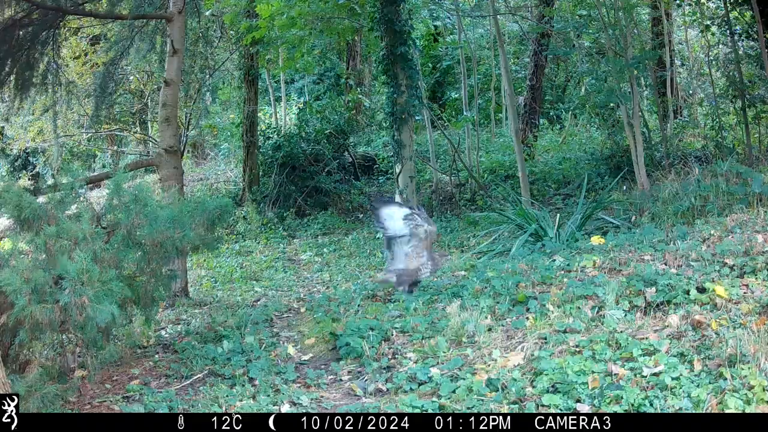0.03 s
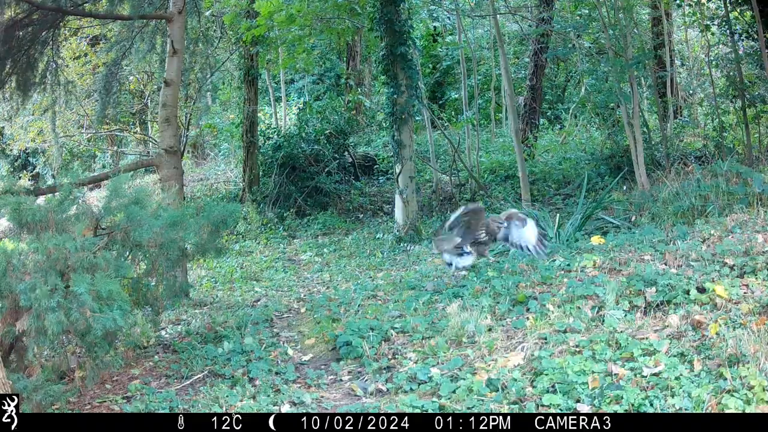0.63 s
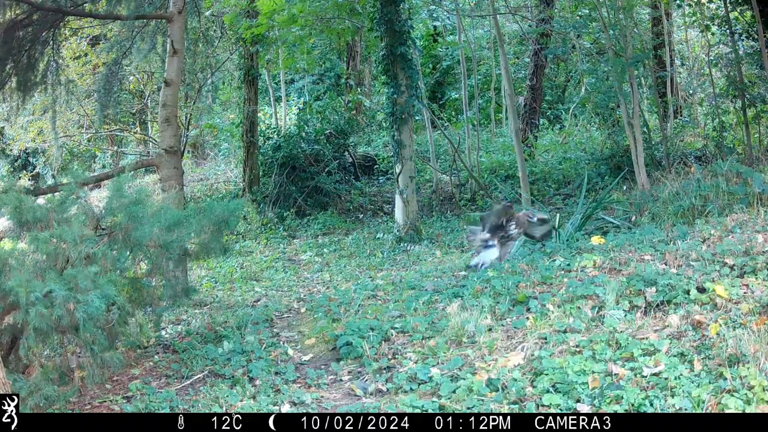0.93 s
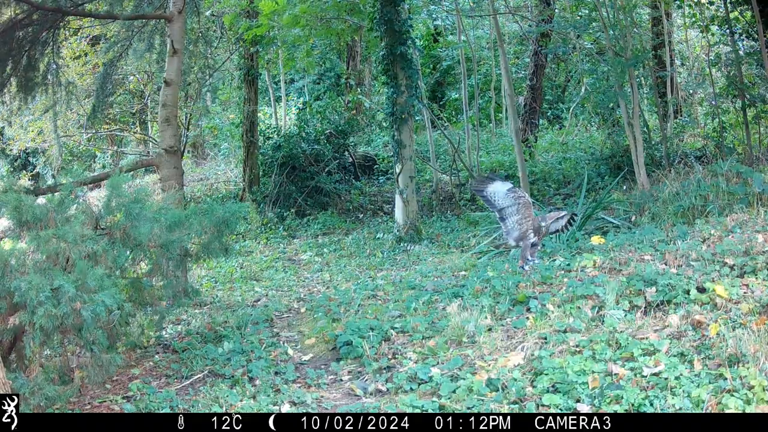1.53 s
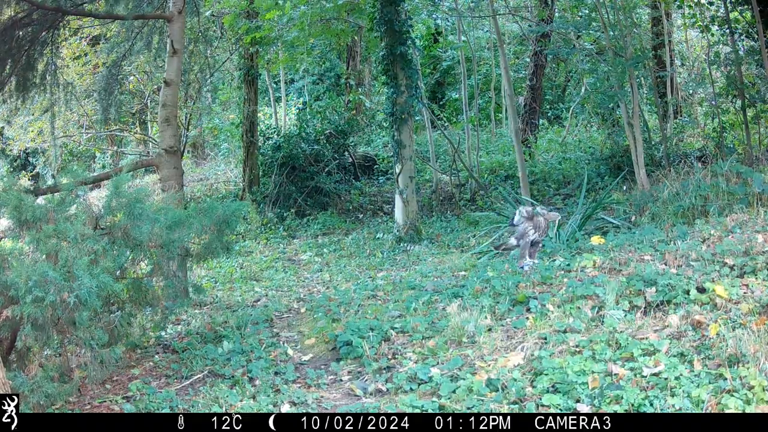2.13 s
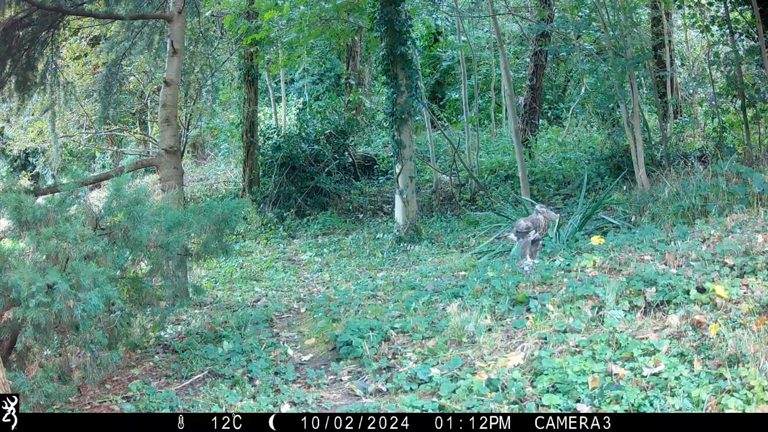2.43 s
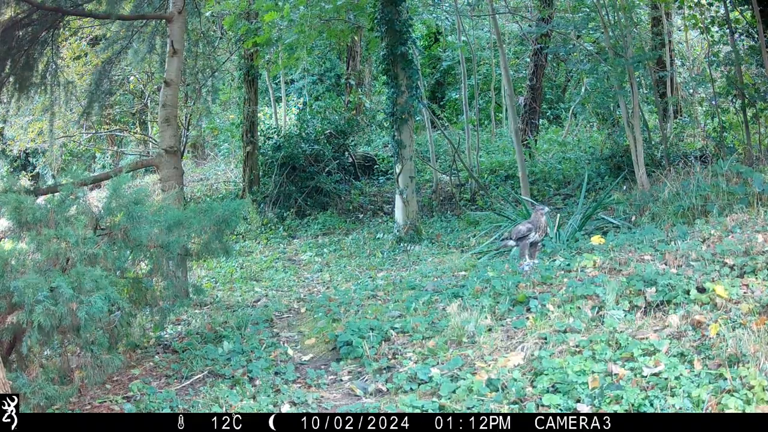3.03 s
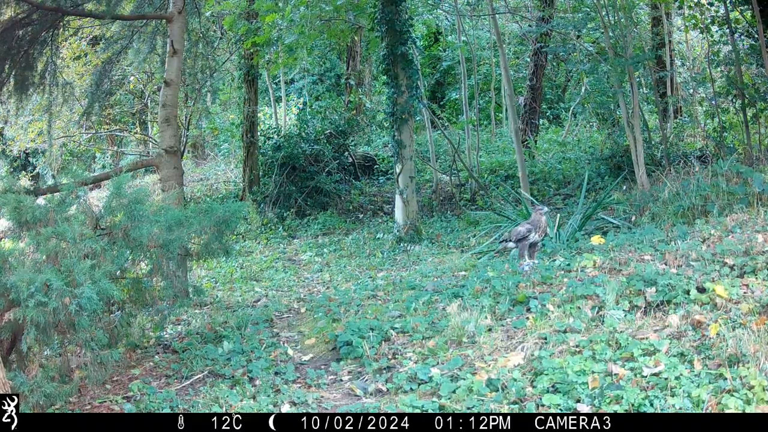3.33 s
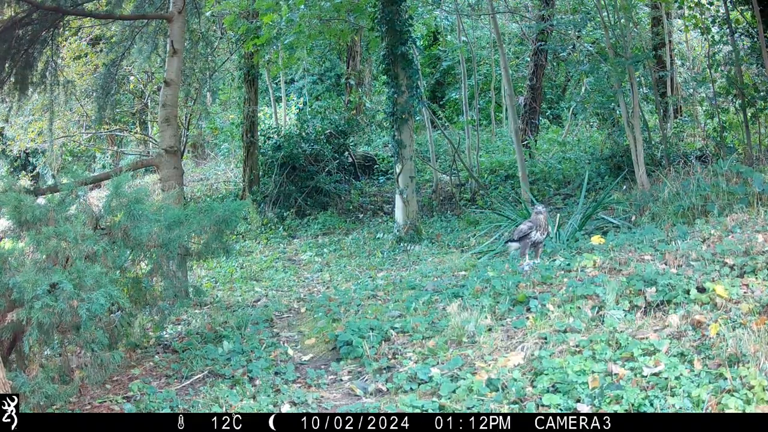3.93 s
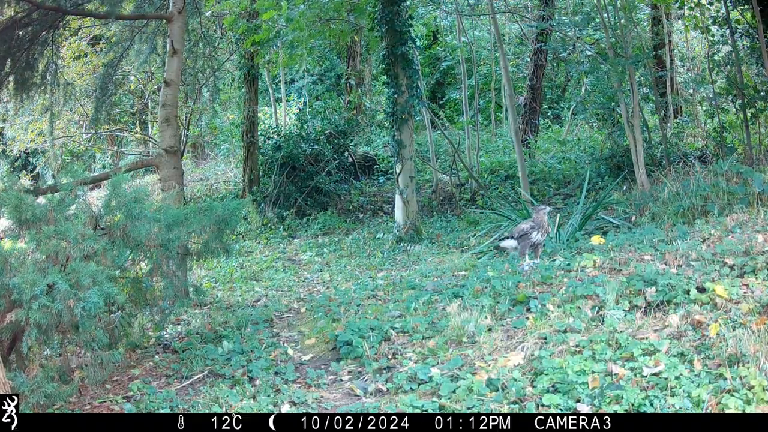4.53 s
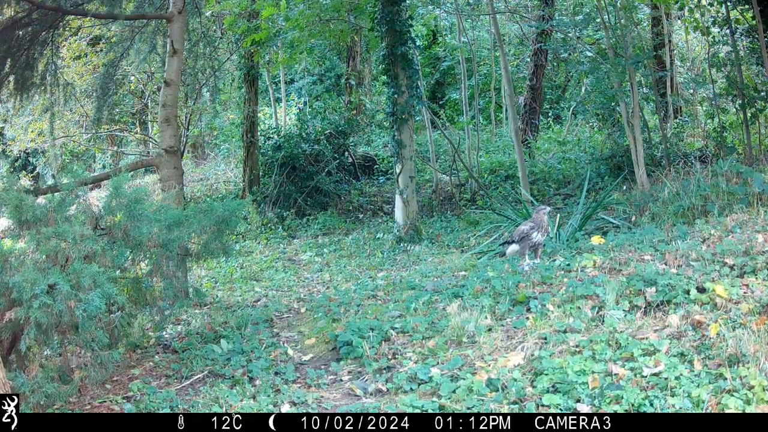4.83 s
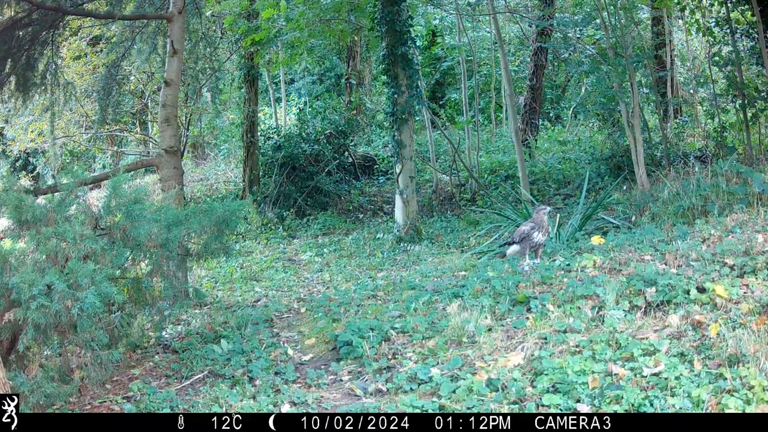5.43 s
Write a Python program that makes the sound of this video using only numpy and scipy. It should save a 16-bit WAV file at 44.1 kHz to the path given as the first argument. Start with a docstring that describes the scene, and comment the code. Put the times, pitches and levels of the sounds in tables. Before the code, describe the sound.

Irregular puffs of air hit a small outdoor microphone, making short low rumbles and clusters of muffled thumps, like buffeting wind or flapping wings. After several stronger ones, they ease into occasional soft bumps. Behind them, quiet woodland carries on throughout: an even hiss of breeze in the leaves, a faint faraway traffic rush with a low drone growing slightly late on, and a few barely audible ticks of dry leaves.

```python
"""A wooded garden where a bird of prey flaps about and settles, heard from a small outdoor camera.
The bed is a steady hiss of leaves in the breeze over a far rush, probably traffic, with a few dry
leaf ticks. Up front, puffs of moving air buffet the microphone port: a lumpy rumble whose
strongest eddies land as clusters of dull pops."""
import sys
import numpy as np
from scipy import signal
from scipy.fft import rfft, irfft, next_fast_len
from scipy.io import wavfile
from scipy.ndimage import uniform_filter1d

SR = 44100
rng = np.random.default_rng(int(sys.argv[2]) if len(sys.argv) > 2 else 0)


def inscribe(sig):
    """Save sig as 16-bit PCM at rate SR to the path in sys.argv[1].

    A 1-D sig is mono; a 2-D sig holds one channel per row.
    Samples are clipped to [-1, 1] before scaling.
    """
    pcm = np.round(np.clip(np.atleast_2d(sig).T, -1, 1) * 32767)
    wavfile.write(sys.argv[1], SR, pcm.astype(np.int16))


N = 246078
T = np.arange(N) / SR

# swells of the far traffic: time_s, rush_db, rush_pitch_hz, drone_db
TRAFFIC_SWELLS = [(0.21, -61.5, 900, -79), (0.8, -61, 880, -73), (1.2, -50, 974, -70),
                  (1.55, -51, 980, -65), (1.85, -55, 946.5, -73), (2.3, -54, 960.3, -76),
                  (2.95, -53, 988, -66), (3.25, -55, 920, -65.5), (3.8, -75, 907, -62.5),
                  (4.4, -57.5, 963, -63.5), (4.9, -61, 908.7, -59.5), (5.58, -67, 896, -63)]
# resonances that colour the low drone: centre_hz, width_hz, gain_db
DRONE_RESONANCES = [(180, 22, 4), (445, 63, -7), (583, 183, 8.5), (644, 46, -1.5)]
# breeze in the trees: time_s, hiss_db, sizzle_db
BREEZE_LEVELS = [(0.21, -51, -73), (0.5, -51.5, -75.5), (1.0, -51, -77), (1.7, -51.5, -79.5),
                 (2.5, -51, -80.5), (3.5, -51.6, -79.5), (4.4, -51, -80), (5.58, -50.5, -80.5)]
# tone of the leaf hiss: frequency_hz, gain_db
HISS_SPECTRUM = [(25, -14), (90, -14), (200, -15.5), (330, -6), (550, -4.5), (850, 0), (1200, 0),
                 (1600, 0.5), (2100, -4), (3000, -10.5), (4500, -22.5), (7000, -43.5), (10000, -54.5)]
# tone of the fine sizzle on top: frequency_hz, gain_db
SIZZLE_SPECTRUM = [(2000, -2), (5000, 9), (7500, -1.5), (9500, -1.5), (11000, -6), (13000, -13.5),
                   (16000, -19)]
# dry leaves shifting: time_s, level_db
LEAF_TICKS = [(0.612, -75), (1.06, -74), (1.315, -71), (2.905, -74), (4.065, -69.5)]
# puffs of air reaching the port: peak_s, strength_db, swell_s
AIR_PUFFS = [(0.299, -42, 0.039), (0.36, -44, 0.024), (0.445, -57, 0.022), (0.903, -53.5, 0.027),
             (1.079, -50, 0.033), (1.16, -44.5, 0.057), (1.24, -50, 0.055), (1.378, -44.5, .022),
             (1.455, -40, 0.027), (1.7, -61, 0.1), (1.984, -33.5, 0.025), (2.055, -43.5, .014),
             (2.18, -54, 0.072), (2.258, -42, 0.019), (2.4, -48, 0.017), (2.506, -57, 0.016),
             (3.075, -53.5, .012), (3.134, -50.5, 0.023), (3.21, -55.5, 0.016), (3.32, -50.5, 0.038),
             (3.5, -58, .12), (3.96, -59.5, 0.044), (4.089, -50.5, 0.015), (4.179, -54, 0.054),
             (4.67, -62.5, 0.043), (5.26, -59, .025), (5.43, -52, 0.025), (5.512, -50.5, .024)]
# rumble bands, one per size of swirl: centre_hz, relative_db, flow_exponent, edge_steepness
SWIRL_BANDS = [(65, -13.5, 0.56, 2.04), (174.6, 0, 1.07, 2.47), (315, 1.5, 2.07, 2.04)]
# strongest eddies, each a single pop: time_s, relative_db, nominal_pitch_hz
STRONG_EDDIES = [(0.2729, -33, 240), (0.28, -21.5, 275), (0.2875, -30, 450), (0.303, -25, 780),
                 (0.3062, -19, 560), (0.31, -19.5, 450), (0.3175, -9.5, 670), (0.3225, -25, 440),
                 (1.1222, -25, 300), (1.13, -18.5, 439.7), (1.166, -30, 380), (1.3605, -31, 280),
                 (1.3928, -25.5, 320), (1.442, -16.5, 447), (1.4515, -29, 380), (1.464, -21, 383),
                 (1.9727, -16, 430), (1.9818, -21, 300), (1.9914, -20.5, 425), (2.0259, -21, 260),
                 (2.0297, -21, 462), (2.2517, -24.5, 340), (2.257, -23.5, 250), (2.297, -30, 220),
                 (3.306, -32.5, 236)]
# moments when the treble dips: centre_s, half_span_s
DULL_MOMENTS = [(0.591, 0.0069), (0.742, 0.009), (0.975, 0.0061), (1.22, .031), (1.528, .018),
                (1.85, 0.015), (3.449, 0.0076), (3.537, 0.0058), (3.618, 0.007), (3.685, .008),
                (3.748, 0.0066), (3.856, 0.01), (4.006, .01)]

CEILING_DB = -43.5   # puff strength at which the flow starts to level off


def from_db(db):
    """Decibels to gain."""
    return 10 ** (np.asarray(db) / 20)


def unit_rms(x):
    """Scale to an rms of 1."""
    return x / np.sqrt(np.mean(x ** 2) + 1e-20)


def automation(rows):
    """Rows of (time_s, values...) become one curve per value, at every sample."""
    times_s, *columns = np.transpose(rows)
    return [np.interp(T, times_s, column) for column in columns]


def shaped_noise(gain_at):
    """Noise of rms 1, shaped by a gain that depends on frequency."""
    size = next_fast_len(N)
    hz = np.maximum(np.arange(size // 2 + 1) * SR / size, 1)
    white = rfft(rng.standard_normal(size))
    return unit_rms(irfft(white * gain_at(hz), size)[:N])


def coloured_noise(spectrum):
    """Noise with an EQ curve drawn through (frequency_hz, gain_db) points."""
    points_hz, db = np.transpose(spectrum)
    return shaped_noise(lambda hz: from_db(np.interp(np.log(hz), np.log(points_hz), db)))


def drift(rate_hz):
    """A smooth random wobble of rms 1, mostly slower than rate_hz."""
    return shaped_noise(lambda hz: 1 / (1 + (hz / rate_hz) ** 2))


def traffic(rush_spread_hz):
    """Far tyres give one broad, gliding band of noise; a lower drone swells later."""
    rush_db, rush_hz, drone_db = automation(TRAFFIC_SWELLS)
    phase = 2 * np.pi * np.cumsum(rush_hz) / SR
    rush = drift(rush_spread_hz) * np.cos(phase) + drift(rush_spread_hz) * np.sin(phase)
    drone = shaped_noise(lambda hz: sum(from_db(db) / (1 + (2 * (hz - centre_hz) / width_hz) ** 2)
                                        for centre_hz, width_hz, db in DRONE_RESONANCES))
    return from_db(rush_db) * rush + from_db(drone_db) * drone


def leaves(flutter_db, flutter_hz):
    """Countless far leaves merge into a smooth hiss; three trees each stir on their own."""
    hiss_db, sizzle_db = automation(BREEZE_LEVELS)
    trees = sum(coloured_noise(HISS_SPECTRUM) * from_db(flutter_db * drift(flutter_hz))
                for _ in range(3))
    return from_db(hiss_db) * unit_rms(trees) + from_db(sizzle_db) * coloured_noise(SIZZLE_SPECTRUM)


def leaf_ticks(centre_hz, half_width_s):
    """A dry leaf shifts with a short, crisp crackle."""
    crackle = shaped_noise(lambda hz: 1 / (1 + (3 * np.log(hz / centre_hz)) ** 4))
    bursts = sum(from_db(db) * np.exp(-((T - time_s) / half_width_s) ** 2) for time_s, db in LEAF_TICKS)
    return bursts * crackle / np.abs(crackle).max()


def airflow(calm_db, fall_stretch, stir_db, stir_decay_s):
    """Flow over the port, 0-1: each puff swells, falls and leaves a tail of stirred air."""
    power = from_db(calm_db) ** 2
    for peak_s, db, swell_s in AIR_PUFFS:
        before, after = np.minimum(T - peak_s, 0), np.maximum(T - peak_s, 0)
        swell = np.exp(-np.minimum((before / swell_s) ** 2, 20))
        fall = np.exp(-np.minimum((after / (swell_s * fall_stretch)) ** 2, 20))
        tail = from_db(stir_db) * np.exp(-after / stir_decay_s)
        power = power + (from_db(db) * swell * np.maximum(fall, tail)) ** 2
    return np.tanh(np.sqrt(power) / from_db(CEILING_DB))


def buffeting(flow, lump_db, lump_hz):
    """Air rumbles on the port in lumps; faster air favours smaller swirls, so hard puffs sit higher."""
    rumble = np.zeros(N)
    for centre_hz, db, exponent, edge in SWIRL_BANDS:
        swirl = shaped_noise(
            lambda hz: (hz / centre_hz) ** (edge - 1) / (1 + (hz / centre_hz) ** (2 * edge)))
        running_rms = np.sqrt(uniform_filter1d(swirl ** 2, size=3500) + 1e-9)
        levelled = swirl / running_rms   # evened out, so the flow rides the level
        rumble += from_db(db) * flow ** exponent * levelled
    lumps_db = lump_db * np.tanh(drift(lump_hz))
    return from_db(CEILING_DB + lumps_db) * rumble


def shed_eddies(flow, full_flow_per_s, relative_db, scatter_db, nominal_hz):
    """Faster air sheds more, stronger and higher eddies at random; rows as in STRONG_EDDIES."""
    born = rng.random(N) < full_flow_per_s * flow / SR
    level_db = relative_db + 20 * np.log10(flow ** 1.4) + scatter_db * rng.standard_normal(N)
    pitch_hz = nominal_hz * flow[born] ** 0.58
    return list(zip(T[born], level_db[born], pitch_hz))


def eddy_pops(eddies, trim_db, pitch_ratio, wake_db, wake_size):
    """Each eddy pops with one swing of pressure, push then suction, inside a wider, weaker swirl."""
    pops = np.zeros(N)
    skews = rng.normal(0, 0.8, (len(eddies), 2))   # radians; off-centre eddies are lopsided
    for (time_s, db, hz), (core_skew, wake_skew) in zip(eddies, skews):
        span = np.clip(round(time_s * SR) + np.arange(-1024, 1024), 0, N - 1)
        phase = 2 * np.pi * hz * pitch_ratio * (T[span] - time_s)
        core = signal.hilbert(-phase * np.exp(-phase ** 2 / 2))
        wake = signal.hilbert(-phase / wake_size * np.exp(-(phase / wake_size) ** 2 / 2))
        pop = core * np.exp(1j * core_skew) + from_db(wake_db) * wake * np.exp(1j * wake_skew)
        pops[span] += from_db(db + trim_db) * pop.real / np.abs(pop).max()
    low_cut = signal.butter(1, 100, "high", fs=SR, output="sos")   # small eddies carry little bass
    return signal.sosfiltfilt(low_cut, pops)


def scene():
    """The mix: trees and road far back, dry leaves nearer, moving air right on the microphone."""
    bed = leaves(flutter_db=1.11, flutter_hz=8.6) + traffic(rush_spread_hz=164)
    ticks = leaf_ticks(centre_hz=10500, half_width_s=0.008)
    flow = airflow(calm_db=-77, fall_stretch=1.2, stir_db=-17, stir_decay_s=0.15)
    rumble = buffeting(flow, lump_db=3.5, lump_hz=56)
    lesser_eddies = shed_eddies(flow, full_flow_per_s=95, relative_db=-28, scatter_db=3, nominal_hz=353)
    pops = eddy_pops(STRONG_EDDIES + lesser_eddies,
                     trim_db=-2.5, pitch_ratio=0.83, wake_db=-16, wake_size=1.73)
    return (bed + ticks + rumble + pops)[None]


def treble_dips(x, cutoff_hz, depth):
    """The top end ducks for a few hundredths of a second at most."""
    dull = signal.sosfiltfilt(signal.butter(6, cutoff_hz, fs=SR, output="sos"), x)
    dips = np.zeros(N)
    for centre_s, half_span_s in DULL_MOMENTS:
        corners_s = centre_s + half_span_s * np.array([-1, -0.5, 0.5, 1])
        dips += np.interp(T, corners_s, [0, 1, 1, 0]) ** 4
    return x + np.clip(depth * dips, 0, 1) * (dull - x)


def record(dry):
    """The camera's colour: a beat of silence, then treble dips, a faint electronic whine, a high cut."""
    start_s, whine_hz, cutoff_hz = 0.209, 15592, 15750
    whine = from_db(-106) * np.sin(2 * np.pi * whine_hz * T)
    heard = (treble_dips(dry, cutoff_hz=3360, depth=0.9) + whine) * (T >= start_s)
    high_cut = signal.ellip(12, 0.1, 70, cutoff_hz, fs=SR, output="sos")
    return signal.sosfilt(high_cut, heard)


dry = scene()
out = record(dry)
inscribe(out)
```